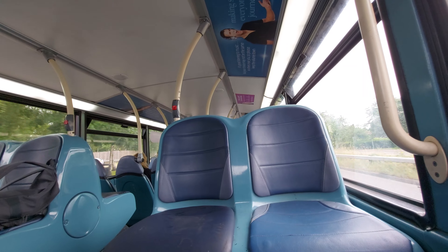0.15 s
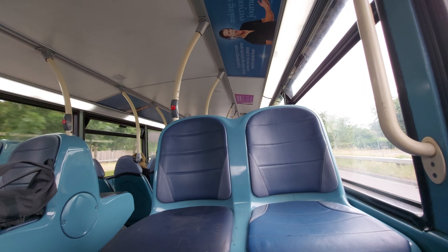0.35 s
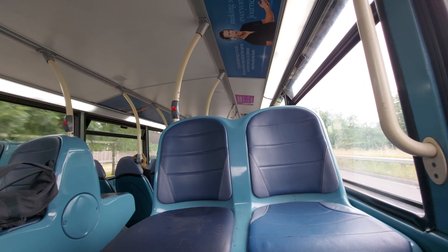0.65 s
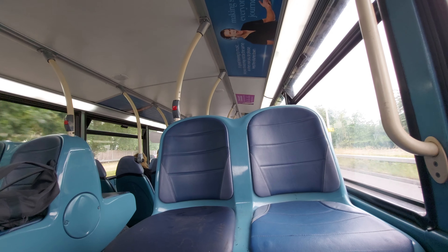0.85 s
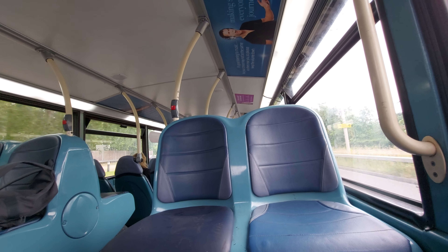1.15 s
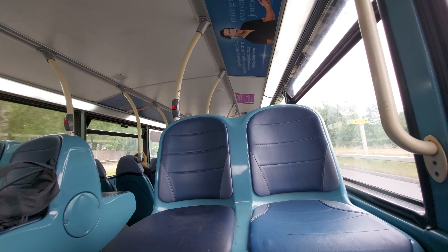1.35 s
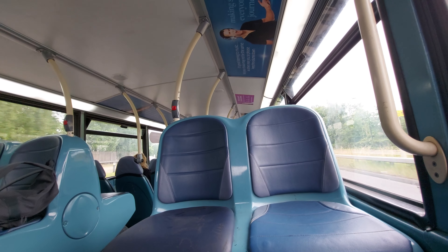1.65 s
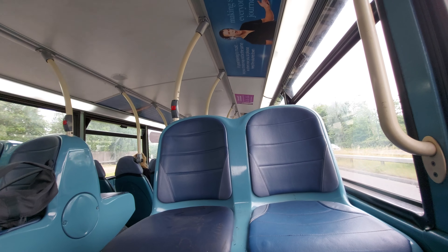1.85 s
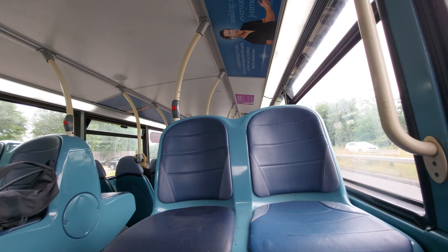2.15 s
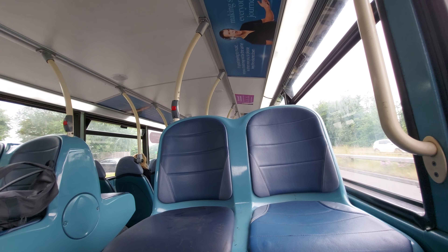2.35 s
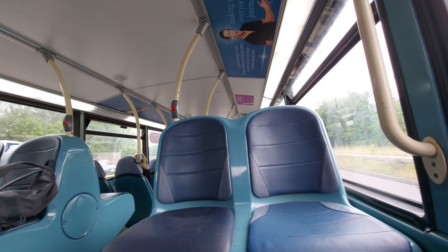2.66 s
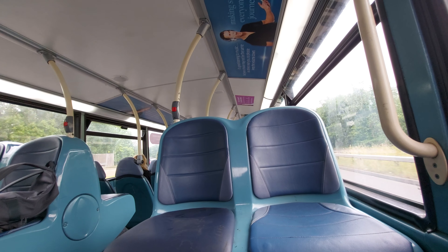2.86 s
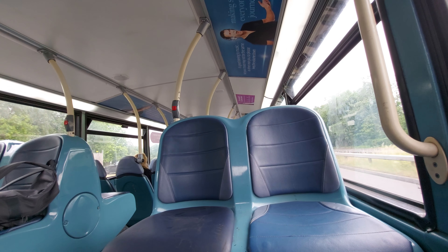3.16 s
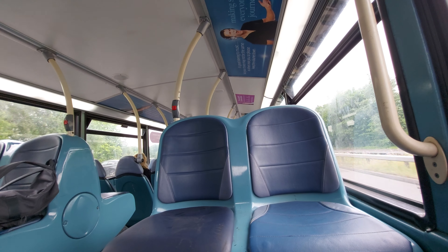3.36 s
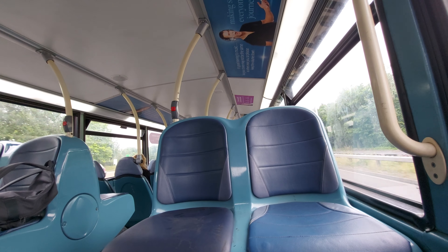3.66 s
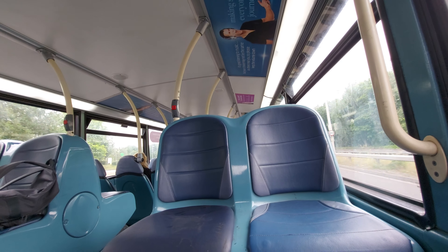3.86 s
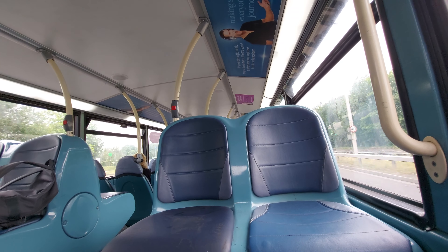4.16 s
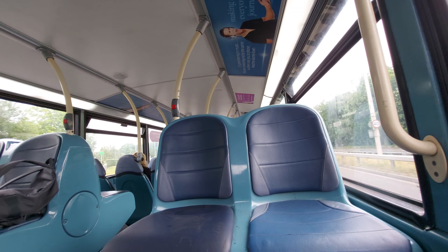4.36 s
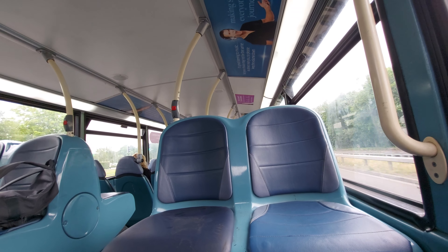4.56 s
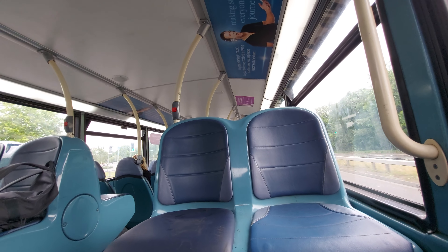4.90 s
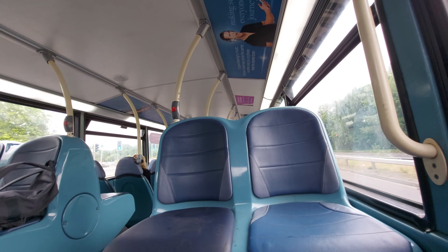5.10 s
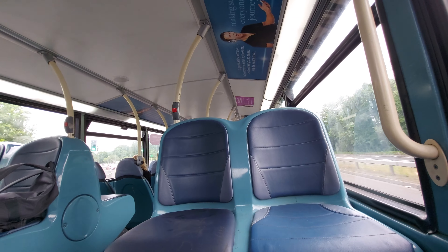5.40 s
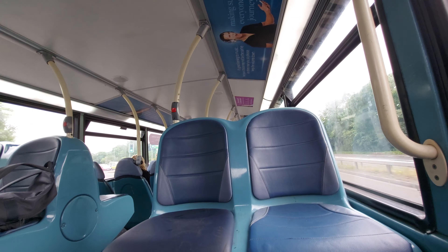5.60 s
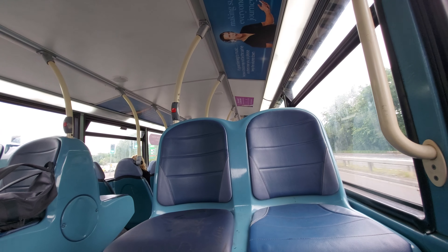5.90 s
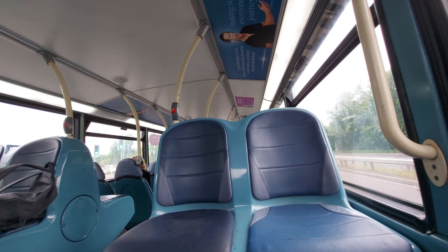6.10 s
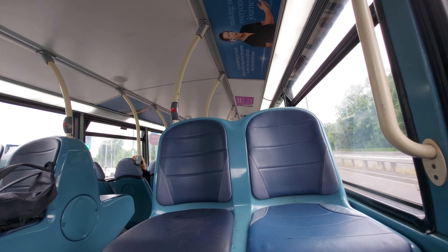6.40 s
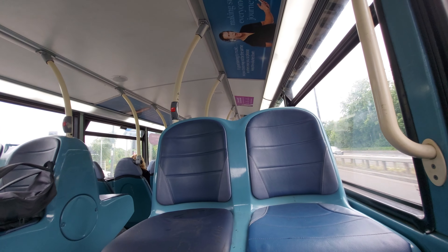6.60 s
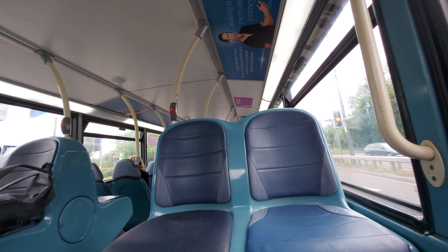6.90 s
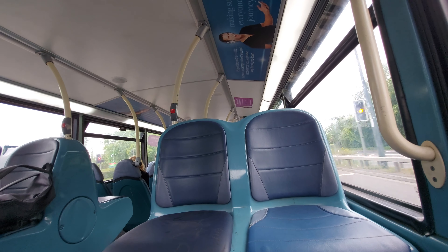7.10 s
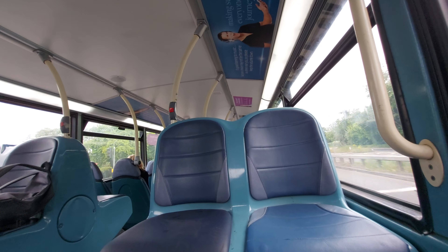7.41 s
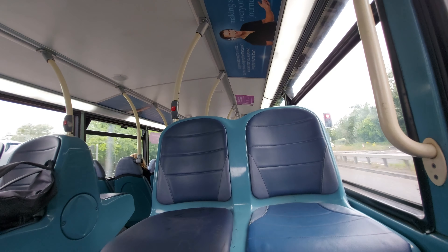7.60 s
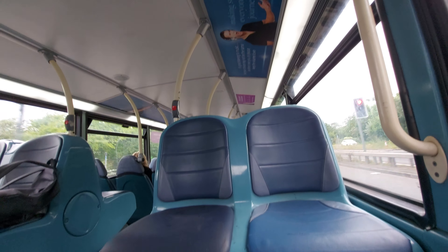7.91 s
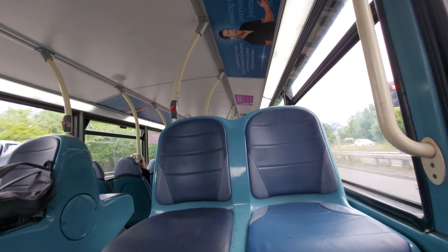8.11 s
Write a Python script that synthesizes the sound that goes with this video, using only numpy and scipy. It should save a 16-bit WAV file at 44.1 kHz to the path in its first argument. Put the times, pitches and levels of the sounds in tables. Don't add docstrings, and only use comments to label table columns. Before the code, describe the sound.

A close stereo microphone in a hard bus cabin catches a loud, low engine boom rising under load. Small metallic ticks, glass rustle and trim buzz come and go over road roar and airy hiss. After a jolting gear change the pitch falls, then creeps upward while a seat mount squeaks repeatedly and panels knock harder.

```python
import sys
import numpy as np
from scipy import signal
from scipy.io import wavfile

SR = 44100
rng = np.random.default_rng(int(sys.argv[2]) if len(sys.argv) > 2 else 0)


def nominal_scale(level):
    x = np.asarray(level, float) / 20
    return 10 ** x


def bounce(signal):
    frames = np.transpose(np.atleast_2d(signal))
    limited = np.clip(frames, -1, 1)
    pcm = np.round(limited * 32767).astype(np.int16)
    wavfile.write(sys.argv[1], SR, pcm)


N = 363825

# t/s, firing rate/Hz
ENGINE = [(0.0, 67.53), (0.3, 68.46), (1.5, 75.63), (3.0, 84.01), (3.6, 87.79), (4.2, 90.5), (4.8, 94.05),
          (5.1, 94.98), (5.56, 97.26), (5.63, 96.5), (5.74, 92.71), (5.86, 84.45), (5.98, 76.84),
          (6.04, 73.95), (6.16, 71.57), (6.35, 70.6), (7.0, 72.52), (8.25, 75.05)]
# f/Hz, likeness
LIKENESS = [(60, 1.0), (130, 0.91), (290, 0.86), (640, 0.16), (1410, -0.35), (3100, 0.098), (6820, -0.15),
            (15000, -0.016)]
# f/Hz, level/dB
LEANING = [(60, -1.0), (110, -1.0), (200, -1.0), (380, 0.5), (700, 1.0), (1290, 0.5), (2380, 0.5),
           (4400, -1.0), (8120, -3.0), (15000, -3.5)]
# start t/s, length t/s, level/dB, first f/Hz
SQUEAKS = [(4.467, 0.051, -55, 5550), (5.463, .1, -55.5, 5340), (6.812, .05, -59, 5700),
           (6.86, 0.085, -48.5, 5520), (6.94, .07, -59.5, 5700), (7.039, .07, -58, 5580),
           (7.19, .1, -65, 5650), (7.36, 0.06, -60, 5530), (7.459, 0.051, -55, 5450),
           (7.517, 0.075, -54.5, 5460), (7.627, 0.069, -57, 5500), (7.689, 0.1, -56.5, 5580),
           (7.803, .07, -63, 5480), (7.902, 0.065, -55, 5480), (7.964, 0.077, -53, 5630),
           (8.037, 0.1, -60, 5570)]
TRIM_T60_S = 0.17


def rms_one(x):
    return x / np.sqrt(np.mean(x ** 2) + 1e-20)


def in_time(rows, before=None):
    s, *columns = np.transpose(rows)
    return [np.interp(np.arange(N) / SR, s, c, before, before) for c in columns]


def at_hz(points, hz):
    point_hz, values = np.array(points)[:, 0], np.array(points)[:, 1]
    return np.interp(np.log(hz), np.log(point_hz), values)


def drift(rate):
    r = np.exp(-80 * np.pi * rate / SR)
    white = rng.standard_normal(N // 40 + 2002)
    slow = signal.lfilter([1], [1, -2 * r, r * r], white)[2000:]
    return np.interp(np.arange(N) / 40, np.arange(len(slow)), rms_one(slow))


def band(x, low_hz, high_hz):
    return signal.sosfilt(signal.butter(2, [low_hz, high_hz], "band", fs=SR, output="sos"), x)


def low_pass(hz):
    return signal.butter(2, hz, fs=SR, output="sos")


def panned(x, db):
    return np.array([x * nominal_scale(db / 2), x * nominal_scale(-db / 2)])


def swell(start, length, edge):
    t = np.arange(N) / SR
    return np.clip(np.minimum(t - start, start + length - t) / edge, 0, 1)


def tone(turns, hz, free=1):
    start = rng.uniform(0, 2 * np.pi)
    sign = rng.choice([-1, 1]) if hz > 90 else -1
    gap = sign * np.arccos(np.clip(at_hz(LIKENESS, hz), -1, 1)) / 2
    angle = 2 * np.pi * turns + free * start
    lean = nominal_scale(at_hz(LEANING, hz) / 2)
    return np.sqrt(2) * np.array([lean * np.sin(angle + gap), np.sin(angle - gap) / lean])


def banded_noise(spectrum, patchy_db):
    low_hz, high_hz = spectrum[0][0], spectrum[-1][0]
    edges = low_hz * 2 ** np.arange(0, np.log2(high_hz / low_hz) + .1, 1 / 3)
    out, together, white = 0, drift(25), rng.standard_normal((2, 2, N))
    for k, (low, high) in enumerate(zip(edges, edges[1:])):
        mid, side = band(white[k % 2], low, high)
        hz = np.sqrt(low * high)
        alike = np.clip(at_hz(LIKENESS, hz), -1, 1)
        gain = nominal_scale(at_hz(spectrum, hz) + patchy_db * (0.86 * together + drift(8.8)))
        lean = nominal_scale(at_hz(LEANING, hz) / 2 * np.array([[1], [-1]]))
        field = np.sqrt(1 + alike) * mid + np.sqrt(1 - alike) * side * [[1], [-1]]
        out = out + gain * lean * field
    return rms_one(out)


def boom_db(firing_hz):
    # firing rate/Hz, level/dB
    firing = [(67, -10), (72, -10), (77, -9), (82, -8.5), (86, -9), (88, -15), (92, -21), (97, -16)]
    # start t/s, length t/s, level/dB
    heaves = [
        (7.6, 0.07, 1),
        (4.9, 0.7, 1),
        (4.86, 0.17, 2.5),
        (5.64, 0.15, 6.5),
        (2.45, .7, 1.35),
    ]
    surge_s, surge_db, rise_s, fall_s = 5.92, 5.5, .11, .08
    late = np.arange(N) / SR - surge_s
    surge = np.clip(np.minimum(1 + late / rise_s, 1 - late / fall_s), 0, 1)
    heave_db = sum(db * swell(s, length, 0.024) for s, length, db in heaves)
    return at_hz(firing, firing_hz) + surge_db * surge + heave_db


def diesel():
    # t/s, level/dB
    effort = [(0.0, -1), (1.5, -4), (3.0, -6), (4.0, -6), (4.8, -0.5), (5.3, 0), (5.65, 3.5), (5.9, 2.5),
              (6.2, -0.5), (7.0, -5.5), (8.25, -1)]
    # multiple, level/dB
    cycle = [(2, -48.5), (3, -43.5), (4, -38.5), (5, -44.5), (8, -30), (9, -30.5), (10, -31.5), (11, -31),
             (12, -26.5), (13, -33), (14, -35.5), (15, -42), (16, -33.5), (17, -41.5), (18, -39),
             (19, -47.5), (20, -42), (21, -36), (22, -49), (23, -42), (24, -43), (25, -52), (26, -43.5),
             (28, -48), (29, -46.5), (30, -45), (31, -43), (32, -51.5), (33, -42.5)]
    # f/Hz, level/dB
    cabin_response = [(25, -2), (45, 3.5), (62, -1), (75, 4), (90, -1.5), (104, 2.5), (118, -7.5), (135, 1),
                      (155, -6), (175, -6), (200, -13), (225, -5.5), (250, 1),
                      (275, 6.5), (300, 0), (330, -10.5), (360, -6), (385, 3.5), (410, 2.5), (440, 7.5),
              (480, -3.5), (560, -2), (700, 5.5), (830, 12), (900, -1.5), (1400, 14.5)]
    # multiple, start t/s, end t/s, level/dB
    swells = [(8, 0, 1.7, -32), (8, 6.6, 7.8, -31), (9, 0, 2.1, -27), (9, 2.9, 4.6, -31),
              (9, 5.9, 8.5, -25), (12, 0, .6, -25), (12, 0, 2.8, -34), (12, 1.45, 2.15, -28),
              (12, 6, 7.5, -32), (16, 4.7, 6.1, -33), (14, 4.6, 5.8, -36), (10, 4.4, 5.9, -34),
              (9, 4.6, 5.7, -38), (18, 3.8, 5.2, -38), (20, 7.3, 8.5, -38), (24, .5, 2.2, -36),
              (24, 2.2, 3.3, -34), (24, 3.5, 4.7, -43), (24, 0, .4, -33), (24, 4.9, 6.05, -23),
              (24, 4.25, 5.0, -35), (33, 5.0, 5.9, -43), (30, 5.3, 6.2, -38), (28, 5.5, 6.3, -36),
              (18, 5.45, 6.1, -31), (18, 4.4, 5.3, -33), (24, 6.8, 8.5, -37), (28, 4.3, 5.1, -40),
              (30, 1.1, 2.1, -39), (32, 2.25, 3.1, -34), (28, 2.7, 3.9, -40), (22, 3.6, 4.5, -39)]
    # firing rate/Hz, level/dB
    lopes = [(67, -29), (76, -34), (85, -34.5), (90, -25), (97, -18.5)]
    (firing_hz,), (effort_db,) = in_time(ENGINE), in_time(effort)
    turns = np.cumsum(firing_hz) / SR
    lope = nominal_scale(at_hz(lopes, firing_hz) + 0.29 * drift(4.1)) * np.cos(2 * np.pi * turns / 6)
    out = (nominal_scale(boom_db(firing_hz) + .3 * drift(7)) + lope) * tone(turns, 60.5, free=0)
    lift_off_s, lift_off_length_s, lift_off_db = 5.76, .3, -6
    lift_off = swell(lift_off_s, lift_off_length_s, .07)
    for multiple, level_db in cycle:
        share = multiple / 6
        gain = nominal_scale(level_db + at_hz(cabin_response, share * firing_hz) + effort_db)
        for louder, start, end, swell_db in swells:
            if louder == multiple:
                gain += nominal_scale(swell_db) * swell(start - .15, end - start + 0.17, 0.67)
        gain *= nominal_scale(lift_off_db * (share > 2.2) * lift_off)
        waver_db = (share > 1.9) * (1.4 * drift(4) + drift(12))
        waver_db = waver_db + 1.2 * drift(2.5) + .8 * drift(9)
        out += gain * nominal_scale(waver_db) * tone(share * turns, share * 80)
    return out


def driveline():
    teeth = [2.79, 3.375, 8.705, 10.085, 9.563, 12.0, 14.0, 3.47]
    # tooth line number, start t/s, end t/s, level/dB
    gears = [(0, 0, .8, -36), (0, .85, 1.8, -37), (0, 1.8, 3.4, -31), (0, 3.85, 4.3, -35),
             (1, .2, 2.6, -36), (1, 1.3, 1.65, -32), (1, 1.6, 2.1, -28), (2, 1.1, 2.05, -44),
             (2, .3, .8, -47), (2, 2.15, 2.7, -41), (2, 2.9, 3.7, -48), (2, 4.4, 5, -47), (2, 5, 5.65, -38),
             (2, 6.4, 8.1, -54), (3, .25, .7, -43), (3, .8, 1.3, -44), (3, 2.4, 3.0, -45),
             (3, 5.3, 7.3, -52), (3, 7.3, 8.5, -57), (4, 6.5, 8, -56), (5, 1.5, 3.4, -58),
             (5, 3.4, 4.5, -50), (5, 2.95, 3.35, -51), (6, 2.42, 2.65, -48), (7, 1.7, 2.7, -34)]
    shift_start_s, shift_end_s, step_up = 5.55, 6.3, 1.416
    t, (firing_hz,) = np.arange(N) / SR, in_time(ENGINE)
    locked = (t < shift_start_s) | (t > shift_end_s)
    geared = firing_hz * np.where(t > shift_end_s, step_up, 1)
    turns = np.cumsum(np.interp(t, t[locked], geared[locked])) / SR
    out = 0
    for k, multiple in enumerate(teeth):
        gain = sum(nominal_scale(db) * swell(a - .1, b - a + 0.15, 0.22) for which, a, b, db in gears if which == k)
        waver = nominal_scale(2.2 * drift(3) + 1.5 * drift(10))
        out = out + gain * waver * tone(multiple * turns, multiple * 80)
    return out


def turbo():
    # t/s, whine f/Hz
    spool = [(0.0, 10430), (0.2, 10460), (1.45, 11290), (3.01, 12251), (3.65, 12566), (4.71, 12955),
             (5.49, 13199), (5.65, 13098), (5.86, 12539), (5.95, 12223), (6.13, 11919), (6.6, 11610),
             (6.92, 11530), (8.02, 11582), (8.25, 11760)]
    hz, = in_time(spool)
    whine_db, boost_from_hz, db_per_khz = -61.5, 12150, 6.6
    level_db = whine_db + db_per_khz * np.maximum(hz - boost_from_hz, 0) / 1000
    ears = []
    for side_db in (-8, 1.5):
        line = np.sin(2 * np.pi * np.cumsum(hz + 12 * drift(30)) / SR)
        white = rng.standard_normal((2, N))
        shoulders = rms_one(signal.lfilter([1], [1, -.98], white[0]))
        skirt = rms_one(signal.sosfilt(low_pass(900), white[1]))
        grain = 1.6 + .85 * shoulders + .6 * skirt
        ears.append(nominal_scale(level_db + side_db + 1.5 * drift(6) + 2.2 * drift(60)) * line * grain)
    return np.array(ears)


def roar():
    # t/s, level/dB
    shaking = [(0.0, 2.5), (0.5, -1), (1.33, -2.5), (1.84, 1), (2.3, -0.5), (2.85, -2), (3.6, -2.5),
               (4.2, 0.5), (4.6, 1), (5.15, 7.5), (5.7, 8.5), (5.95, 4), (6.15, 0), (6.7, -1), (7.0, 2),
               (7.9, 3.5), (8.1, 1), (8.25, 0)]
    # f/Hz, level per Hz/dB
    rumble_spectrum = [(13, -58.5), (22, -16), (32, -22), (63, -8), (86, 2.5), (104, -11), (129, -18.5),
                       (190, -14.5), (268, -12), (338, -18), (414, -15), (900, -34), (1170, -68),
                       (1980, -120)]
    # f/Hz, level per Hz/dB
    clatter_spectrum = [(290, -25), (500, -10), (786, -11.5), (935, -10), (1370, -13), (1620, -16.5),
                        (2030, -16), (3050, -32.5), (4000, -36.5), (5200, -56), (8800, -120)]
    # f/Hz, level per Hz/dB
    hiss_spectrum = [(1470, -34), (2500, -7.5), (3220, -6), (3720, -6), (4570, -7.5), (6210, -7),
                     (8180, -8), (9450, -9), (12000, -12.5), (15100, -22.5), (15500, -21)]
    rumble_db, clatter_db, hiss_db = -24.5, -41, -50.5
    deep_follows, rumble_follows, clatter_follows, hiss_follows = .15, 0.58, 0.63, 0.65
    shake_db, = in_time(shaking)
    rumble = banded_noise(rumble_spectrum, patchy_db=1.2)
    deep = signal.sosfiltfilt(low_pass(115), rumble)
    body = nominal_scale(deep_follows * shake_db) * deep + nominal_scale(rumble_follows * shake_db) * (rumble - deep)
    out = nominal_scale(rumble_db) * body
    out += nominal_scale(clatter_db + clatter_follows * shake_db) * banded_noise(clatter_spectrum, patchy_db=0.77)
    return out + nominal_scale(hiss_db + hiss_follows * shake_db) * banded_noise(hiss_spectrum, patchy_db=1.12)


def squeak_hz(t):
    climb_hz_per_s = 410
    start, length, _, first_hz = np.transpose(SQUEAKS)
    fit = np.maximum(np.searchsorted(start, t) - 1, 0)
    return first_hz[fit] + climb_hz_per_s * np.clip(t - start[fit], 0, length[fit])


def squeaks():
    # t/s, f/Hz, level/dB
    rising = [(.19, 4850, -70), (.21, 4950, -59), (.29, 5200, -57.5), (.35, 5450, -57.5), (.39, 5560, -62),
              (.44, 5650, -72)]
    # start t/s, length t/s, first f/Hz, last
    # f/Hz, level/dB
    singing = [
        (6.15, .18, 1795, 1795, -52),
        (6.3, .3, 1975, 1975, -52),
        (6.41, .1, 2180, 2180, -52),
        (2.14, .05, 2290, 2290, -52),
        (1.975, .075, 4170, 4210, -57),
        (2.02, .08, 3220, 3220, -61),
        (1.975, .05, 3560, 3560, -58),
        (6.33, .42, 272, 258, -29),
        (2.03, .07, 2750, 2750, -58),
    ]
    t = np.arange(N) / SR
    rough = rms_one(signal.lfilter([1], [1, -1.95, .950625], rng.standard_normal((2, N))))
    gain = sum(nominal_scale(db) * swell(s, length, .17 * length) for s, length, db, _ in SQUEAKS)
    gain += nominal_scale(in_time(rising, before=-200)[1])
    drag_s, drag_length_s, drag_db = 6.8, 1.38, -65.5
    gain += nominal_scale(drag_db + 3 * drift(16)) * swell(drag_s, drag_length_s, 0.033)
    hz = np.where(t < 1, in_time(rising)[0], squeak_hz(t))
    hz = hz + np.where(t < 1, 40, 26) * drift(40)
    angle = 2 * np.pi * np.cumsum(hz) / SR
    grain = .65 + .55 * rough
    whistle = np.sin(angle) + nominal_scale(-10.5) * np.sin(2 * angle)
    out = gain * nominal_scale(4.5 + 1.3 * drift(40)) * grain * whistle
    for start, length, from_hz, to_hz, level_db in singing:
        hz = np.interp(t, [start, start + length], [from_hz, to_hz])
        gain = nominal_scale(level_db + 2.2 * drift(45)) * swell(start, length, .2 * length)
        out += gain * tone(np.cumsum(hz) / SR, from_hz)
    return out


def trim_ring(blows):
    # f/Hz, level/dB, t60/s
    trim = [(1360, -6, 0.026), (1984, -2.5, 0.019), (2440, -9, .03), (2886, -10, 0.029)]
    contact_db = -7
    chatter_per_s = 300
    out, age = np.zeros((2, N)), np.arange(SR // 25) / SR
    for hz, level_db, t60 in trim:
        rebounds = rng.standard_normal(len(age)) * (rng.random(len(age)) < chatter_per_s / SR)
        chatter = (age == 0) + rebounds * nominal_scale(-60 * age / TRIM_T60_S)
        struck = np.convolve(signal.fftconvolve(blows, chatter), np.hanning(9) / 4)[:N]
        struck = struck * nominal_scale(level_db + contact_db + 2 * drift(20))
        r, w = nominal_scale(-60 / (t60 * SR)), 2 * np.pi * hz / SR
        ring = signal.lfilter([0, np.sin(w)], [1, -2 * r * np.cos(w), r * r], struck + 1e-18)
        out += panned(ring, rng.normal(0, 2))
    return out


def knocks():
    # t/s, peak level/dB, brightness above 4 kHz level/dB
    bumps = [(0.404, -36, -6.5), (0.4472, -39, -19), (0.852, -31, -25.5), (0.862, -41.5, -11.5),
             (0.9577, -41.5, -12.5), (3.189, -50, -12.5), (4.985, -36, -7), (5.4336, -45, -16),
             (5.471, -38, -9.5), (5.805, -39, -12.5), (6.105, -35, -4), (6.784, -37, -12),
             (6.892, -38, -11), (7.2432, -30, -18.5), (7.3452, -33.5, -18), (7.7236, -31.5, -36),
             (7.7677, -32.5, -20), (7.8355, -46.5, -15), (7.892, -25.5, -12), (7.925, -27, -3.5),
             (7.96, -33.5, -5), (7.9988, -33.5, -6.5), (8.2104, -37.5, -8)]
    thud_db = -2
    crack_db, crack_t60_s = 4, .06
    grains = rng.standard_normal((2, N)) * (rng.random(N) < 4000 / SR)
    dull = rms_one(band(grains + 0.14 * rng.standard_normal((2, N)), 900, 2800))
    dull += nominal_scale(thud_db) * rms_one(band(rng.standard_normal(N), 300, 900))
    bright = rms_one(band(rng.standard_normal((2, N)), 3600, 9500))
    blows, out = np.zeros(N), np.zeros((2, N))
    for s, peak_db, bright_db in bumps:
        i = int(s * SR)
        blows[i] = nominal_scale(peak_db)
        age = np.arange(min(N - i, SR // 4)) / SR
        span = slice(i, i + len(age))
        shape = np.minimum(age * 1500, 1) * nominal_scale(peak_db - 11.5 - 60 * age / TRIM_T60_S)
        crack = 1 + nominal_scale(crack_db - 60 * age / crack_t60_s)
        out[:, span] += shape * (crack * dull[:, span] + nominal_scale(bright_db) * bright[:, span])
    return out + trim_ring(blows)


def tick_times():
    # t/s, peak level/dB, ticks in a row
    ticks = [(0.9672, -40, 1), (1.038, -42, 1), (1.064, -50, 1), (1.2, -46, 1), (2.001, -40, 1),
             (2.024, -43, 1), (1.4122, -44, 1), (1.4536, -45, 1), (1.637, -37, 1), (1.7144, -35, 1),
             (1.7685, -31, 1), (1.8067, -43, 1), (1.846, -27.5, 1), (1.896, -48, 1), (1.923, -33.5, 1),
             (1.974, -31, 1), (2.0494, -33.5, 1), (2.3375, -47, 1), (2.4248, -43, 1), (2.5255, -45, 1),
             (2.2, -39.5, 1), (2.2272, -35, 1), (2.5989, -40, 1), (3.387, -40, 1), (3.8193, -44.5, 1),
             (3.8666, -41, 2), (4.0228, -37, 3), (4.3775, -41, 1), (4.488, -38.5, 1), (5.1256, -37, 1),
             (5.2537, -37, 1), (5.4328, -40, 1), (5.5308, -41, 1), (5.6673, -41.5, 1), (5.839, -32.5, 2),
             (5.9807, -29.5, 1), (6.008, -35, 1), (7.318, -36.5, 1), (6.962, -41, 1), (7.195, -41, 1),
             (7.39, -47, 1), (8.095, -46, 1), (7.672, -34, 1), (7.8356, -27, 1), (7.99, -45, 1),
             (8.02, -33, 1), (8.2056, -31, 1)]
    strays_per_s, stray_db = 2.6, -48.5
    rows = []
    for s, db, count in ticks:
        cycle_s = 6 / np.interp(s, *np.transpose(ENGINE))
        rows += [(s + k * cycle_s, db) for k in range(count)]
    luck = rng.random((60, 2))
    strays = np.cumsum(-np.log(1 - luck[:, 0]) / strays_per_s)
    rows += [(s, stray_db + 8 * (u - .5)) for s, u in zip(strays, luck[:, 1]) if s < N / SR]
    return np.transpose(rows)


def latch():
    # f/Hz, level/dB, t60/s
    modes = [(3550, -2, .012), (3850, 1.5, .011), (4200, -1, .010), (2800, -6, .008)]
    s, peak_db = tick_times()
    spread = rng.normal(0, 1, (len(s), 2 * len(modes)))
    out = np.zeros((2, N))
    for k, (hz, level_db, t60) in enumerate(modes):
        clicks = np.zeros((2, N))
        strength = panned(nominal_scale(peak_db + level_db - 5), -3.5)
        clicks[:, (s * SR).astype(int)] = strength * nominal_scale(2.1 * spread[:, 2 * k:2 * k + 2].T)
        r, w = nominal_scale(-60 / (t60 * SR)), 2 * np.pi * hz / SR
        out += signal.lfilter([0, 0, np.sin(w) ** 2 / w], [1, -2 * r * np.cos(w), r * r], clicks + 1e-18)
    return out


def shivers():
    # start t/s, length t/s, level/dB
    buzzes = [
        (1.95, 0.13, -64),
        (2.3, 0.24, -62),
        (2.45, .26, -55.5),
        (7.36, 0.076, -54),
    ]
    # start t/s, length t/s, level/dB
    rustles = [(1.03, .05, -59), (1.642, 0.082, -57), (1.77, .065, -54.5), (1.85, .03, -58),
               (1.97, .12, -52.5), (2.231, .04, -60), (3.38, 0.13, -58), (4.019, 0.087, -61),
               (5.816, .2, -53), (7.25, .04, -55), (7.934, .12, -56), (8.21, .06, -53)]
    road_db, road_from_s, road_top_hz = -34.5, 7, 42
    grains = rng.standard_normal((2, N)) * (rng.random(N) < 6000 / SR)
    buzz = sum(nominal_scale(db) * swell(s, length, .02) for s, length, db in buzzes)
    thuds = rms_one(band(rng.standard_normal(N), 8, road_top_hz)) * nominal_scale(2.7 * drift(3))
    rustle = sum(nominal_scale(db) * swell(s, length, .012) for s, length, db in rustles)
    rustle = rustle * nominal_scale(2.7 * drift(60))
    out = buzz * rms_one(band(grains, 3300, 6200))
    out = out + rustle * rms_one(band(grains[::-1], 2600, 4500))
    return out + nominal_scale(road_db) * swell(road_from_s, 3, .25) * panned(thuds, -.9)


def cabin(x, t60=0.28, wet_db=-6):
    age = np.arange(SR // 4) / SR
    tail = rng.standard_normal((2, len(age))) * nominal_scale(-60 * age / t60) * (age > .004)
    tail /= np.sqrt(np.sum(tail ** 2, axis=1, keepdims=True))
    return x + nominal_scale(wet_db) * signal.fftconvolve(x, tail, axes=1)[:, :N]


def scene():
    fittings = nominal_scale(0.5) * band(latch(), 3050, 4500) + knocks()
    return diesel() + driveline() + turbo() + roar() + cabin(fittings) + squeaks() + shivers()


def top_cut(x):
    return signal.sosfilt(signal.butter(12, 15690, fs=SR, output="sos"), x)


def record(dry):
    port = signal.iirnotch(9700, 4.5, fs=SR)
    heard = 0.38 * dry + 0.5 * signal.lfilter(*port, dry)
    heard = heard / (1 + np.abs(heard / .85) ** 4) ** .25
    return top_cut(heard)


dry = scene()
out = record(dry)
bounce(out)
```